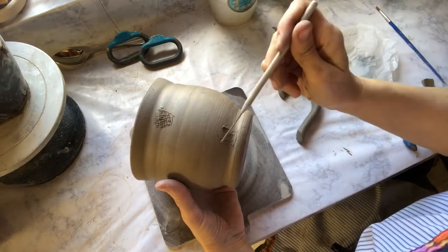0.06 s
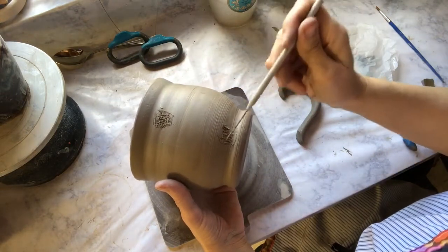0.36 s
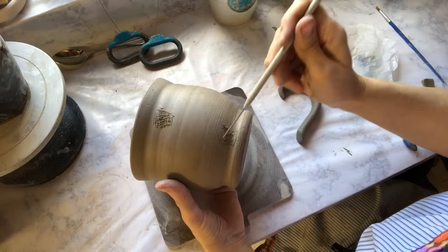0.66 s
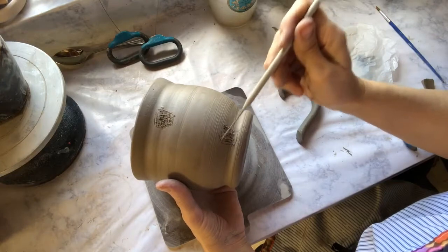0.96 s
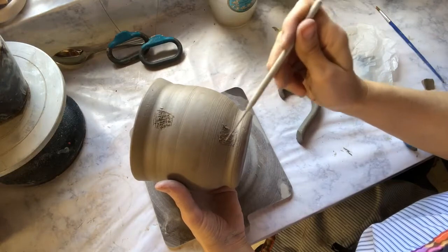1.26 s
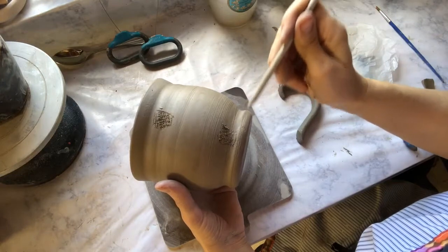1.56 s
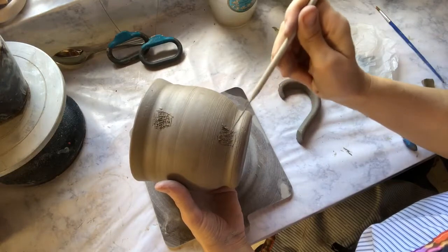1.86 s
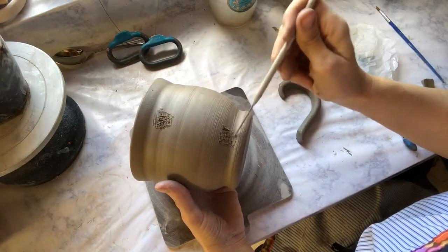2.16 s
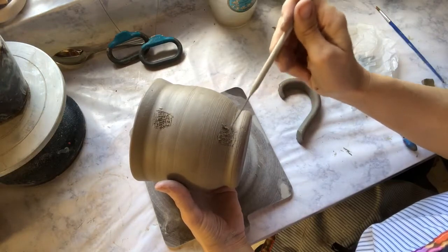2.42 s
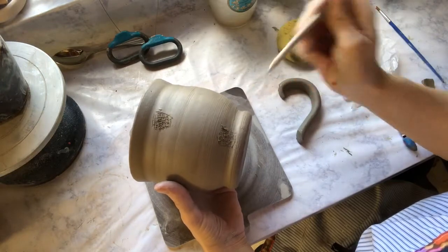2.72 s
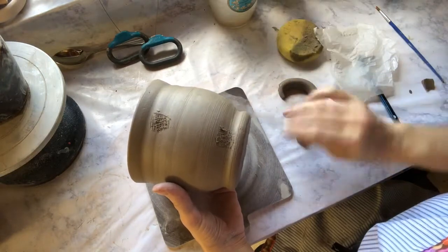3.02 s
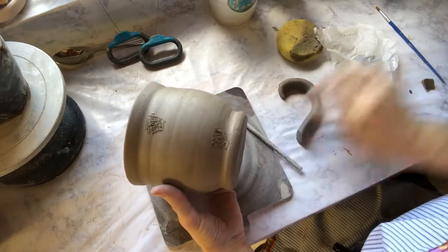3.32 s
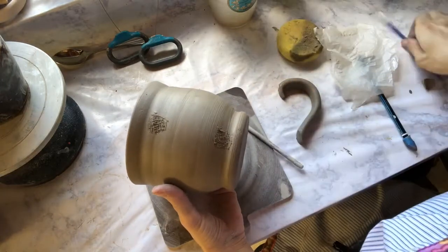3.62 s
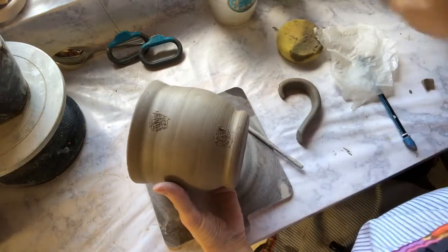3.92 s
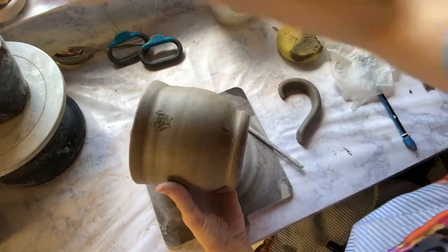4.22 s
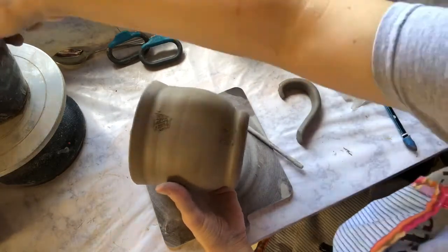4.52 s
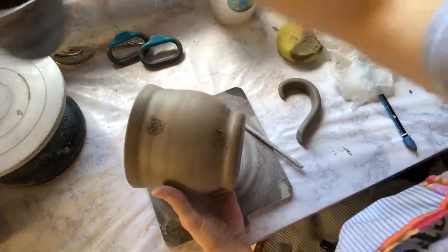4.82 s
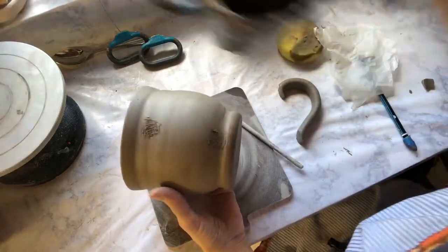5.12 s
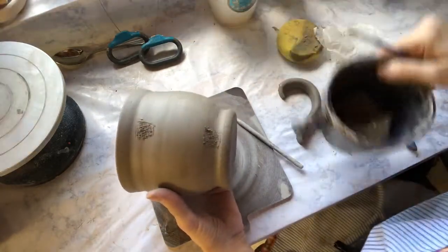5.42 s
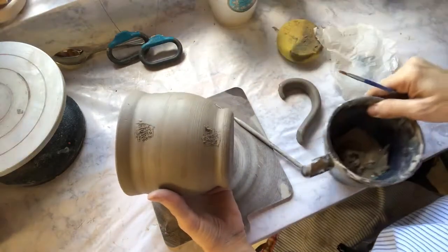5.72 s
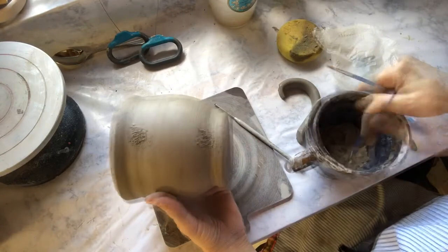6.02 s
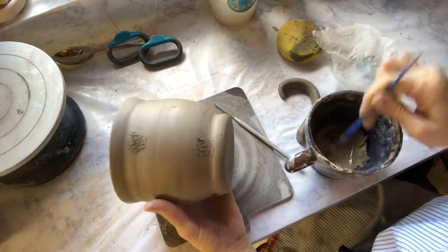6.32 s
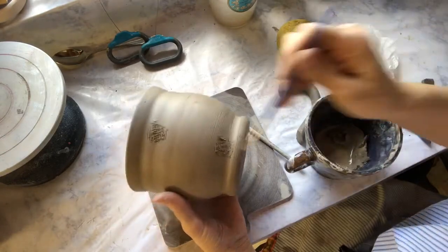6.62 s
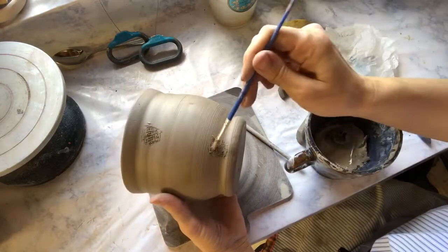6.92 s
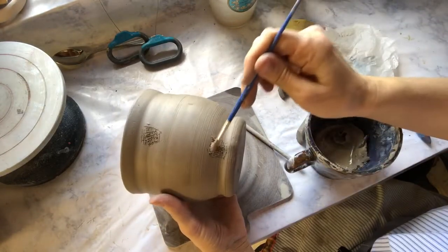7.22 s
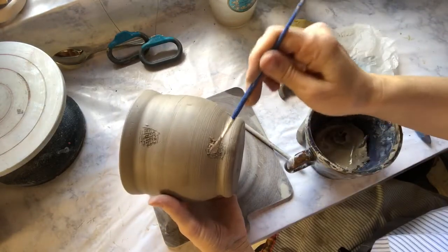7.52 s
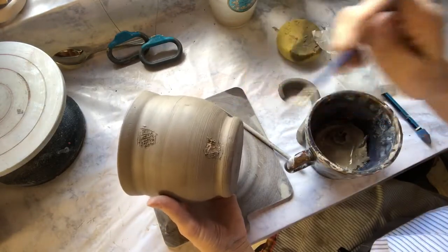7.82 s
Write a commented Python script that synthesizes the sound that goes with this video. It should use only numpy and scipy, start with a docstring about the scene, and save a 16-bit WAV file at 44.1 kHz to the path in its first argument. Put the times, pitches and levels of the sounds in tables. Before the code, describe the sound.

A close microphone picks up low, steady room tone in a small, quiet studio, with a faint rumble of a pot shifting in the hands. Until about 2.6 seconds, a steel needle scores firm clay in roughly ten faint, short, high scratches. At 3.2 seconds the tool drops on a work board with a sharp crack and a few quick, lightly ringing bounces, by far the loudest moment. Around 3.5 seconds the table thumps softly and a wooden brush rubs briefly as it is dragged off. A sleeve rustles faintly from 3.7 seconds. At about 4.5 seconds a glazed mug is tapped, then clinks and rattles as it is lifted, with a low bump. From 5.8 to 6.1 seconds it is set down with dull knocks and a gritty slide. Only a couple of tiny ticks and faint shifting remain until the end at 8 seconds.

```python
"""Faint scratches of a steel needle tool scoring a firm clay pot, close to one microphone in a quiet studio.
Tearing grains ring the steel; then the potter drops the tool and it cracks and bounces on the work board.
A brush is dragged off the table; a mug of slip clinks as it is lifted and is set down with a gritty slide.
The table top booms softly under the knocks, over a sleeve's rustle and low, steady room tone."""
import sys
import numpy as np
from scipy import signal
from scipy.fft import rfft, irfft
from scipy.io import wavfile

SR = 44100
rng = np.random.default_rng(int(sys.argv[2]) if len(sys.argv) > 2 else 0)


def wrap_up_sound(samples):
    """Save the sound to the file named by the first command line argument, as 16-bit audio."""
    columns = np.atleast_2d(samples).T
    # keep every value between -1 and 1, then stretch to whole-number steps
    tamed = np.clip(columns, -1, 1)
    steps = np.round(tamed * 32767).astype(np.int16)
    wavfile.write(sys.argv[1], SR, steps)


N = 355446
TIME = np.arange(N) / SR

# the tool's point touches the board, then the dropped tool hits it and bounces: # start_s, crack_db,
# tilt_db_per_octave, lean_to_point_db, thump_db, thump_corner_hz
TOOL_HITS = [(3.085, -39, .5, -2, -42, 290), (3.2140, -26, -6.5, -3, -46, 900),
             (3.2170, -13, -1.1, 6, -30, 900), (3.3005, -16, 0.5, -4.5, -46, 700),
             (3.3325, -30, -5.5, 6, -46.5, 1100), (3.3803, -39, -9, -3, -54, 1100)]
# hand, brush and mug bump the table: start_s, thump_db, thump_corner_hz, dust_crack_db
TABLE_BUMPS = [(3.5406, -33.5, 300, -51), (3.557, -31.5, 290, -57), (3.681, -52.5, 403, -49),
               (4.542, -54, 440, -70), (4.581, -44.5, 490, -48), (4.602, -31, 104, -69),
               (5.815, -36, 176, -36.5), (5.968, -40.5, 185, -51), (6.11, -57, 170, -75)]
# colour of crushed clay dust: frequency_hz, level_db
DUST_SPECTRUM = [(200, -25), (900, -8), (1700, -2.5), (2800, -4), (4200, 4), (6500, 1), (9000, -5),
                 (12000, -7.5), (16000, -6.5)]


def gain_of(db):
    """Decibels to amplitude."""
    return 10 ** (np.asarray(db) / 20)


def curve_at(points, hz):
    """Reads a table along a log-frequency axis."""
    frequencies, values = np.transpose(points)
    return np.interp(np.log(hz + 1), np.log(frequencies + 1), values)


def motion(moves, rise_s, stop_s):
    """Gain over time of moves that each speed up, hold and die away; their powers add."""
    gains = []
    for start_s, length_s, db in moves:
        rise = np.clip((TIME - start_s) / rise_s, 0, 1)
        fall = np.exp(-np.maximum(TIME - start_s - length_s, 0) / stop_s)
        gains.append(gain_of(db) * rise * fall)
    return np.linalg.norm(gains, axis=0)


def add(mix, start_s, sound):
    """Mixes a sound in at start_s."""
    part = mix[max(round(start_s * SR), 0):][:len(sound)]
    part += sound[:len(part)]


def coloured(x, spectrum, tilt_db=0, size=4096):
    """Causal filter of unit energy with the given spectrum, tilted by tilt_db per octave above 1 kHz."""
    hz = abs(np.fft.fftfreq(size, 1 / SR))
    log_gain = np.log(gain_of(curve_at(spectrum, hz) + tilt_db * np.log2(np.maximum(hz, 1000))))
    taps = np.fft.ifft(np.exp(np.conj(signal.hilbert(log_gain)))).real  # minimum phase
    return signal.oaconvolve(x, taps / np.linalg.norm(taps))[:len(x)]


def decay(t, t60_s):
    """Amplitude that falls 60 dB in t60_s."""
    return np.exp(-np.log(1000) * t / t60_s)


def ring(modes, rise_s):
    """Modes set swinging by one blow, each dying at its own speed."""
    t = TIME[:SR // 3]
    tones = [gain_of(db) * decay(t, t60_s) * np.sin(2 * np.pi * hz * t) for hz, db, t60_s in modes]
    return sum(tones) * (1 - np.exp(-t / rise_s))


def burst(decay_s):
    """The brief chatter of two hard surfaces meeting."""
    t = TIME[:SR // 8]
    return rng.choice([-1., 1.], len(t)) * np.exp(-t / decay_s)


def grains(per_s, spread_db):
    """Tiny fractures at random moments, a few much larger than the rest; rms 1."""
    sizes = gain_of(spread_db * np.minimum(rng.exponential(1, N), 4))
    clicks = sizes * rng.choice([-1., 1.], N) * (rng.random(N) < per_s / SR)
    return clicks / np.sqrt(np.mean(clicks ** 2) + 1e-20)


def needle(snag_s=0.016, edge_share=0.33):
    """The point tears through grains of clay, and each one rings the steel."""
    # strokes, each snagging once: start_s, length_s, level_db, snag_start_s, snag_db
    strokes = [(0.08, 0.18, -74.5, .175, -90), (.44, .12, -81, .497, -73), (.73, .12, -80, .785, -68),
               (1.043, 0.091, -72, 1.108, -86), (1.296, 0.092, -75.5, 1.38, -69.5),
               (1.55, .075, -80, 1.612, -81), (1.793, 0.076, -75.5, 1.807, -72.5),
               (1.955, .03, -85, 1.962, -70), (2.01, .052, -76, 2.044, -73), (2.182, .08, -81, 2.18, -79),
               (2.569, 0.07, -79.5, 2.562, -73.5)]
    # resonances of the needle held against clay: pitch_hz, width_hz, level_db
    modes = [(4020, 170, -10.5), (5020, 124, 11), (5800, 260, -3), (10140, 220, 2.5), (11000, 140, -6),
             (13300, 340, -0.5)]
    press = lambda length_s: signal.windows.tukey(round(length_s * SR), edge_share)
    steel = lambda x: sum(gain_of(db) * signal.lfilter(*signal.iirpeak(hz, hz / width_hz, SR), x)
                          for hz, width_hz, db in modes)
    force = np.zeros(N)
    for start_s, length_s, db, snag_start_s, snag_db in strokes:
        add(force, start_s, gain_of(db) * press(length_s))
        add(force, snag_start_s, gain_of(snag_db) * press(snag_s))
    tearing = grains(per_s=1400, spread_db=3.8)
    ringing = gain_of(-2.2) * steel(force * tearing) / np.std(steel(tearing))
    crumbling = gain_of(-15) * coloured(force * tearing, DUST_SPECTRUM, tilt_db=4.0)
    return ringing + crumbling


def dropped_tool(handle_db=-16, point_db=-31.5):
    """The tool slaps the board and bounces; the end that lands rings more, and the steel sings on."""
    # colour of the slap: frequency_hz, level_db
    crack = [(100, -37), (500, -6.5), (1000, -11.5), (1400, 3), (1850, -6), (2400, 0.5), (3000, 1),
             (3700, 1.5), (5500, -6), (8000, -8.5), (9500, -19), (12000, -21.5), (16000, -28)]
    # modes of the handle and of the free steel point: pitch_hz, level_db, t60_s
    handle = [(1548, 2, .028), (2228, -12, .1), (2514, -11, .09), (3203, -7, .05), (3512, -9, .08),
              (3900, -8, .016), (4404, -12, .18)]
    point = [(6010, -14, .2), (10195, 0, .21), (13400, -25, .15)]
    out = np.zeros(N)
    for start_s, db, tilt_db, lean_db, _, _ in TOOL_HITS:
        add(out, start_s, gain_of(db) * coloured(burst(decay_s=0.0025), crack, tilt_db))
        add(out, start_s, gain_of(db + handle_db - lean_db) * ring(handle, rise_s=0.00018))
        add(out, start_s, gain_of(db + point_db + lean_db) * ring(point, rise_s=0.0011))
    return out


def table_top(travel_s=.005, lowest_hz=85, size=32768):
    """Soft blows stir only the low modes; the bending wave is dispersive, so the lowest arrive last."""
    # modes of the top: pitch_hz, level_db, t60_s
    modes = [(98, -15.5, 0.41), (129, -17.5, 0.12), (159.6, -12.5, 0.24), (185, -8.5, 0.12),
             (213.7, -7.5, .1), (244, -2, 0.15), (290, 0.5, 0.062), (343.1, -4, .1), (400, -5, .1),
             (445, 4, 0.11), (490, -1, 0.056), (573.5, -1.5, 0.1003), (635, -7.5, 0.11),
             (792.3, -4.5, 0.15), (874.3, -5, 0.072), (1039, 3, 0.1), (1250, 0, 0.1)]
    t, bin_hz = TIME[:size], np.fft.rfftfreq(size, 1 / SR)
    knock = sum(gain_of(db) * decay(t, t60_s) * np.cos(2 * np.pi * hz * t) for hz, db, t60_s in modes)
    # travel_s is the travel time at 300 Hz; speed grows with the root of frequency
    knock = irfft(rfft(knock) * np.exp(-4j * np.pi * travel_s * np.sqrt(300 * bin_hz)))
    # a small top radiates little bass
    knock = signal.sosfilt(signal.butter(2, lowest_hz, "highpass", fs=SR, output="sos"), knock)
    softened = lambda corner_hz: signal.sosfilt(signal.butter(4, corner_hz, fs=SR, output="sos"), knock)
    out = np.zeros(N)
    for start_s, *_, db, corner_hz in TOOL_HITS:
        add(out, start_s, gain_of(db) * softened(corner_hz))
    for start_s, db, corner_hz, _ in TABLE_BUMPS:
        add(out, start_s, gain_of(db) * softened(corner_hz))
    return out


def mug(chink_db=-12):
    """The glazed mug is tapped, then rattles as it leaves its stand; each ring has a gritty edge."""
    # light taps on the rim, and the clatter of the lift: start_s, level_db
    taps = [(4.4897, -49), (4.542, -71)]
    clatters = [(4.5655, -54), (4.571, -41.5), (4.579, -57), (4.5934, -41.5), (4.608, -50)]
    # modes of the rim and of the whole mug: pitch_hz, level_db, t60_s
    rim = [(1080, -2.5, 0.046), (1200, 3, 0.039), (1770, -5.5, 0.087), (3930, -6.5, 0.14),
           (4250, -0.5, 0.023), (6720, -6, 0.098), (7950, -15, .07), (8312, -20, .09)]
    body = [(344, -2, 0.13), (561.3, -5, 0.22), (964, -15.5, 0.058), (1015, -5, 0.033), (1704, -15, 0.19),
            (2640, -9.5, 0.2), (2940, -7, 0.16), (3760, -27, 0.05), (4000, 0.5, 0.077), (5430, -15, 0.11),
            (6944, -9, 0.068), (7430, -13.5, 0.094), (8550, -10.5, 0.04), (9388, -26, 0.077),
            (10860, -13, 0.056), (15200, -13, 0.045)]
    out = np.zeros(N)
    for blows, modes in (taps, rim), (clatters, body):
        for start_s, db in blows:
            chink = coloured(burst(decay_s=0.0017), DUST_SPECTRUM, tilt_db=6.0)
            add(out, start_s, gain_of(db) * ring(modes, rise_s=0.00016))
            add(out, start_s, gain_of(db + chink_db) * chink)
    return out


def clay_dust():
    """Dry clay dust is ground under the sliding mug and cracks under every bump."""
    # the mug scrapes off its stand, later jerks into place: start_s, length_s, level_db
    slides = [(4.569, 0.013, -53), (5.78, 0.2, -59.5), (5.812, 0.059, -55), (5.925, 0.025, -61),
              (6.058, 0.042, -69.5)]
    # single crumbs crack: start_s, level_db
    crumbs = [(2.226, -70), (4.235, -65.5), (5.806, -50), (5.949, -54), (6.014, -56.5), (6.40, -68.5),
              (7.401, -68.5)]
    crushing = motion(slides, rise_s=0.0052, stop_s=0.011) * grains(per_s=3400, spread_db=3.5)
    for start_s, *_, db in TABLE_BUMPS + crumbs:
        add(crushing, start_s, gain_of(db) * burst(decay_s=0.0026))
    return coloured(crushing, DUST_SPECTRUM)


def brush():
    """The wooden brush rubs over cloth as it is dragged off the table."""
    # short drags: start_s, length_s, level_db
    drags = [(3.545, 0.013, -56.5), (3.616, 0.021, -56), (3.675, 0.028, -64.5)]
    # colour of wood on cloth: frequency_hz, level_db
    spectrum = [(200, -9), (850, 6.5), (1400, -4), (2050, 4), (2700, -6.5), (4500, 0), (7000, -5),
                (9500, -9), (16000, -12)]
    rubbing = motion(drags, rise_s=0.013, stop_s=0.045) * grains(per_s=7900, spread_db=2.0)
    return coloured(rubbing, spectrum)


def sleeve():
    """Soft hiss of cloth fibres slipping over each other as a sleeve stretches."""
    # the arm reaches over the table: start_s, length_s, level_db
    reaches = [(3.7, 0.3, -68), (4.36, 0.16, -70.5)]
    # colour of the cloth: frequency_hz, level_db
    spectrum = [(200, 7.5), (1500, -4), (5000, -9.5), (9000, -16), (16000, -16)]
    hiss = coloured(grains(per_s=3400, spread_db=1.5), spectrum)
    return motion(reaches, rise_s=0.11, stop_s=0.25) * hiss


def shifting_pot():
    """Low rumble of the pot and hands shifting on the table."""
    # spells of movement: start_s, length_s, level_db
    shifts = [(.1, 1.1, -70.5), (1.2, 1.3, -67), (3.7, 1.8, -71), (6.55, 0.52, -80), (7.85, .2, -70.5)]
    # colour of the rumble: frequency_hz, level_db
    spectrum = [(30, -37.5), (70, -11.5), (93, 4), (125, -16.5), (170, -5.5), (260, -19), (500, -20.5),
                (1100, -22.5), (3000, -52)]
    return motion(shifts, rise_s=0.15, stop_s=0.29) * coloured(rng.standard_normal(N), spectrum)


def room_tone(level_db=-68):
    """The low, steady noise of the quiet studio."""
    # colour of the noise: frequency_hz, level_db
    spectrum = [(20, -30.5), (45, -4.5), (85, 4.5), (120, -9.5), (190, -4.5), (350, -9), (700, -11),
                (1050, -12), (1900, -19), (3500, -23.5), (7400, -27), (8500, -30), (15800, -32.5)]
    return gain_of(level_db) * coloured(rng.standard_normal(N), spectrum)


def reflections(x, gap_s=0.0016, build_s=0.0029):
    """Dense reflections of a small studio, each band dying at its own speed."""
    # room decay: frequency_hz, t60_s
    decay_times = [(150, 0.39), (400, 0.25), (1000, 0.2), (3000, 0.13), (7000, 0.13), (14000, 0.1)]
    hz, t, bands = signal.stft(rng.standard_normal(SR // 2), SR, nperseg=256)
    bands = bands * decay(t, curve_at(decay_times, hz)[:, None])
    _, tail = signal.istft(bands, SR, nperseg=256)
    tail *= 1 - np.exp(-np.maximum(TIME[:len(tail)] - gap_s, 0) / build_s)
    return signal.fftconvolve(x, tail / np.linalg.norm(tail))[:N]


def scene():
    """The work table from close by, in mono, with the room well behind the direct sound."""
    scrapes = needle() + clay_dust() + brush()
    tool, clinks, boom = dropped_tool(), mug(), table_top()
    room = reflections(gain_of(-12) * scrapes + gain_of(-11) * tool
                       + gain_of(-14.5) * clinks + gain_of(-9) * boom)
    return (scrapes + tool + clinks + boom + room + sleeve() + room_tone() + shifting_pot())[None]


def record(dry, low_cut_hz=45, high_cut_hz=15900):
    """The microphone loses the deepest bass, and the highest treble is cut off."""
    thinned = signal.sosfilt(signal.butter(4, low_cut_hz, "highpass", fs=SR, output="sos"), dry)
    band_limit = signal.firwin(511, high_cut_hz, window=("kaiser", 9), fs=SR)
    return signal.oaconvolve(thinned, band_limit[None], "same")


dry = scene()
out = record(dry)
wrap_up_sound(out)
```